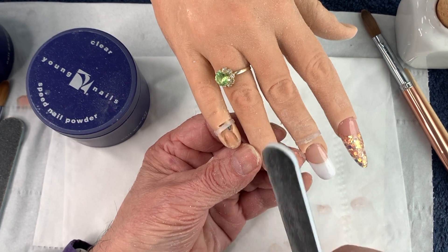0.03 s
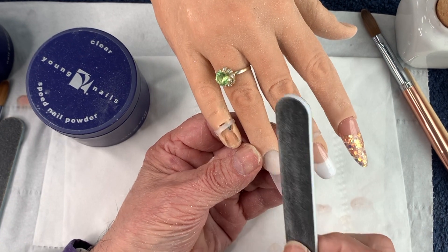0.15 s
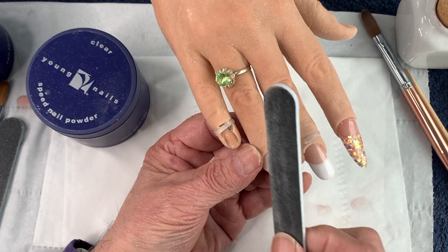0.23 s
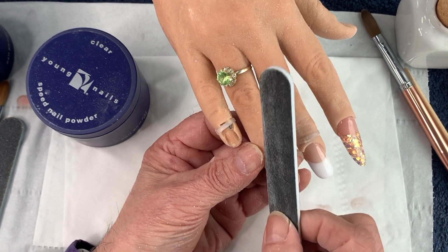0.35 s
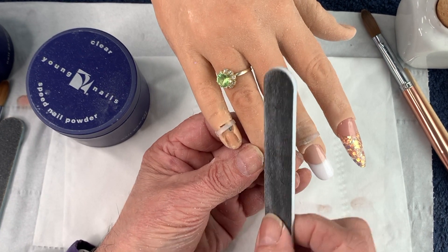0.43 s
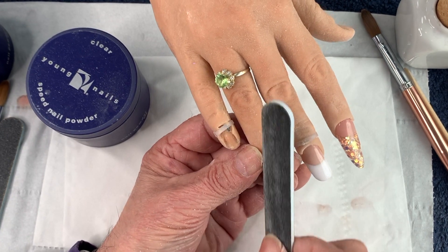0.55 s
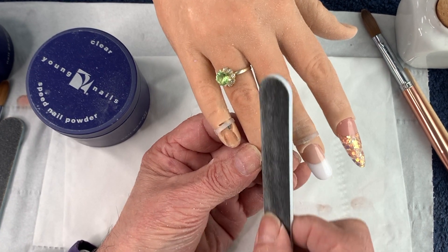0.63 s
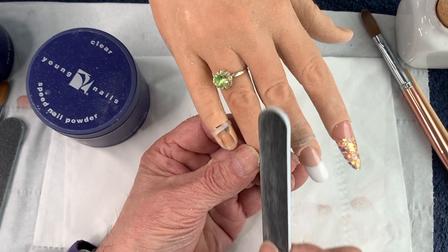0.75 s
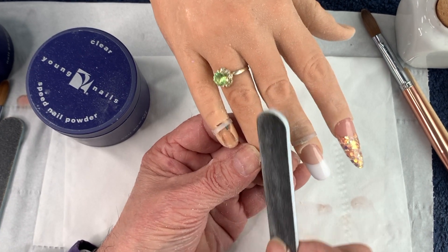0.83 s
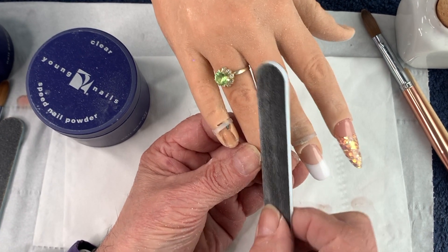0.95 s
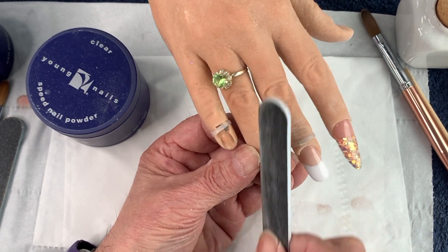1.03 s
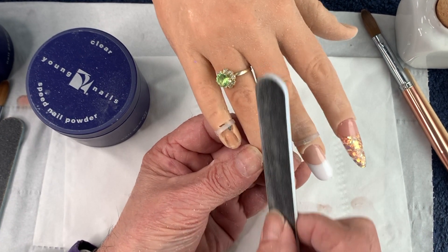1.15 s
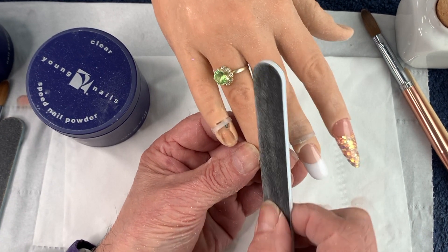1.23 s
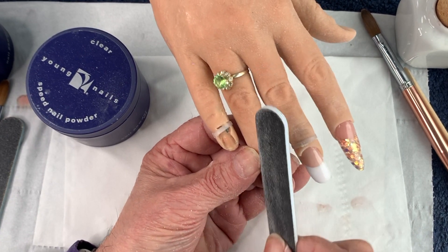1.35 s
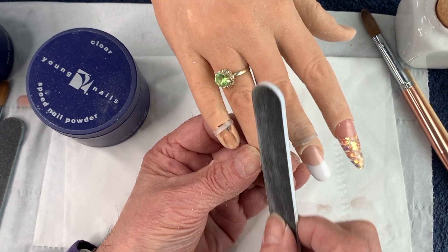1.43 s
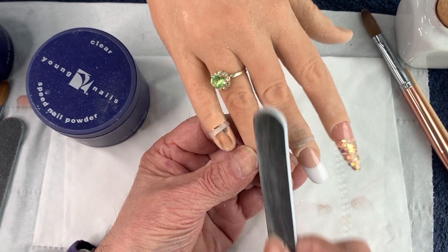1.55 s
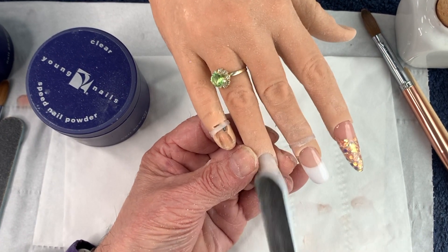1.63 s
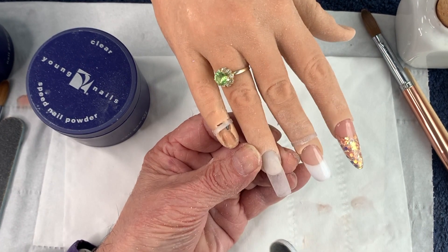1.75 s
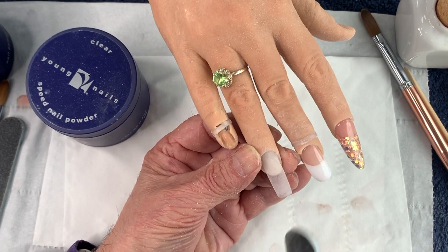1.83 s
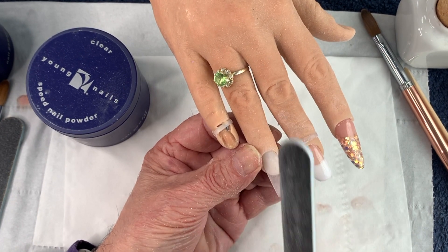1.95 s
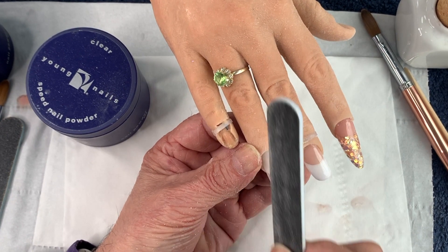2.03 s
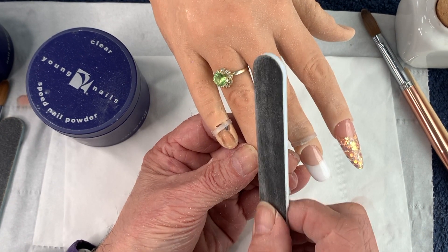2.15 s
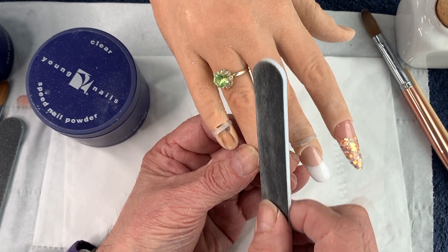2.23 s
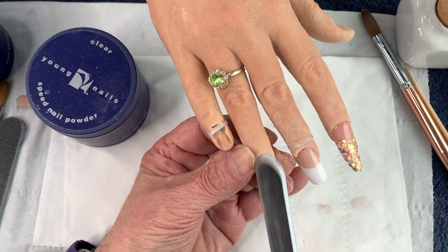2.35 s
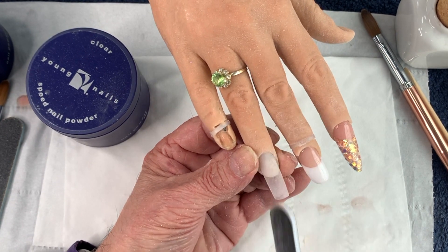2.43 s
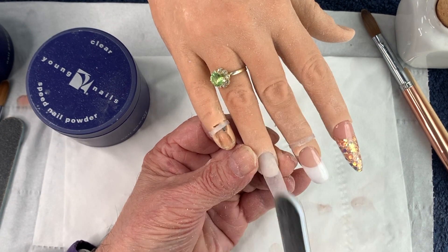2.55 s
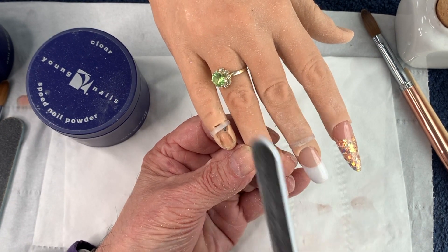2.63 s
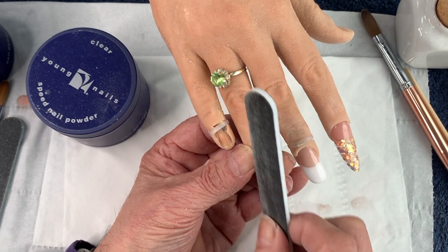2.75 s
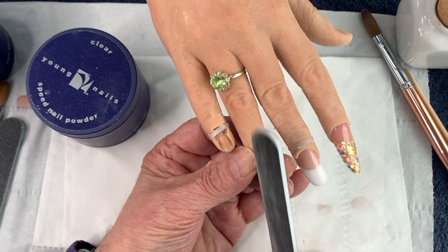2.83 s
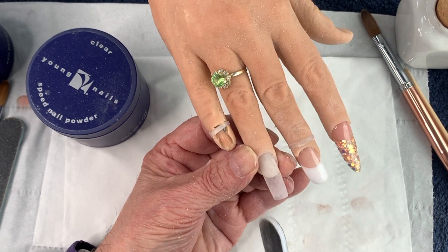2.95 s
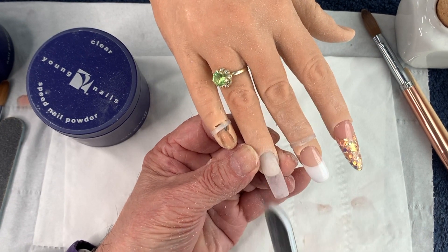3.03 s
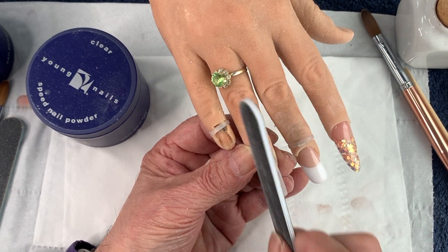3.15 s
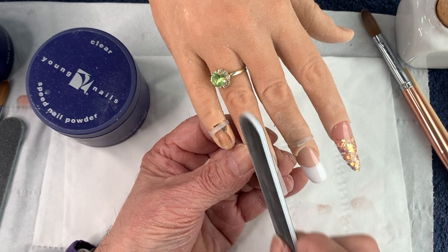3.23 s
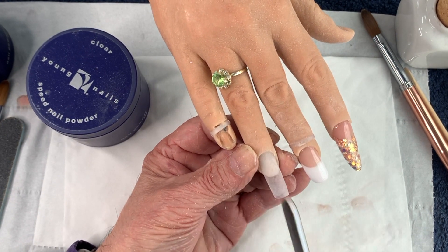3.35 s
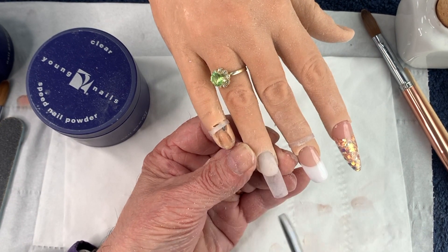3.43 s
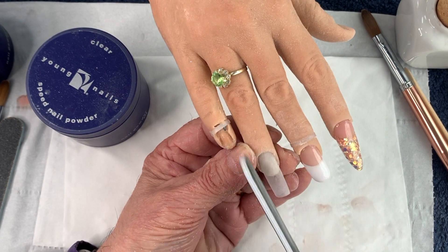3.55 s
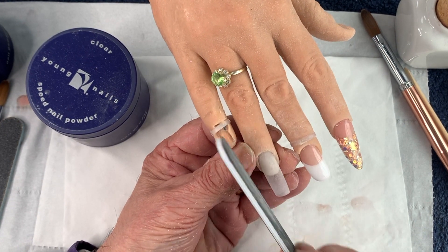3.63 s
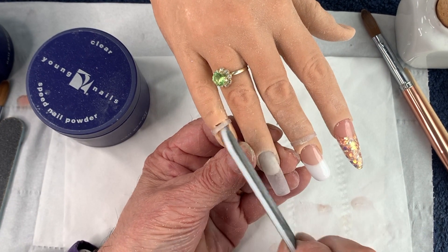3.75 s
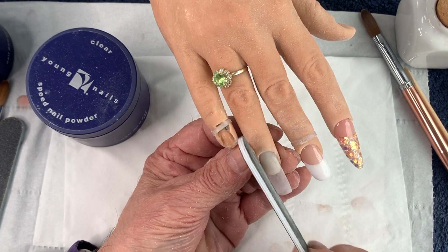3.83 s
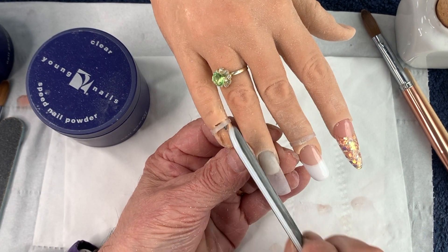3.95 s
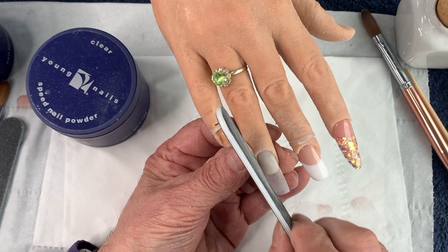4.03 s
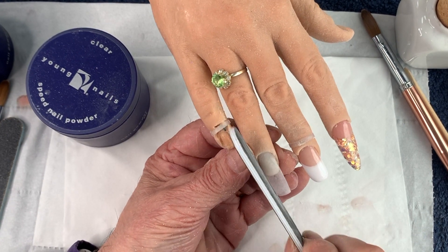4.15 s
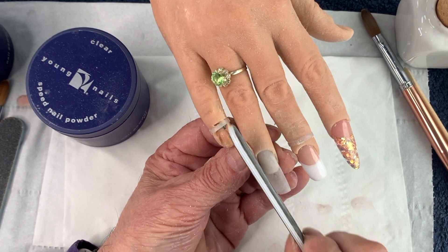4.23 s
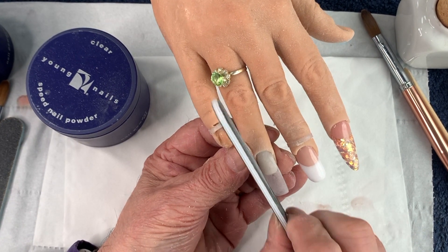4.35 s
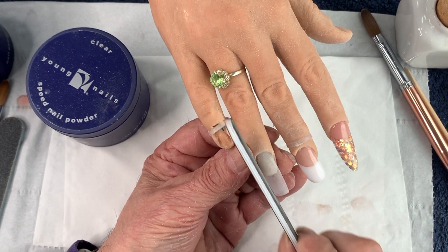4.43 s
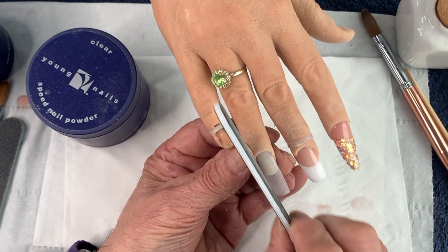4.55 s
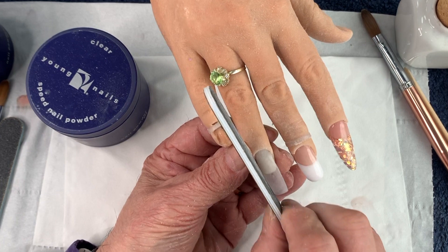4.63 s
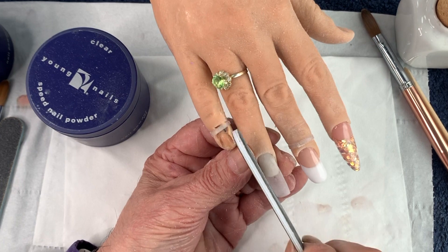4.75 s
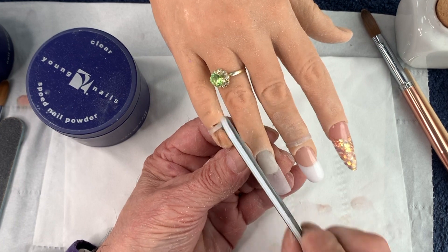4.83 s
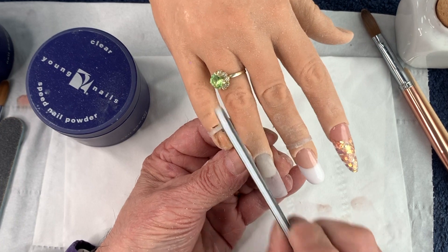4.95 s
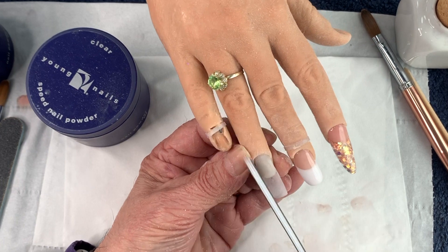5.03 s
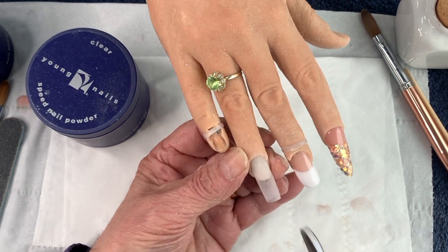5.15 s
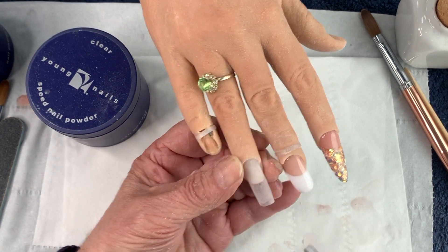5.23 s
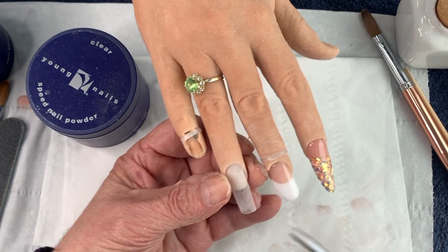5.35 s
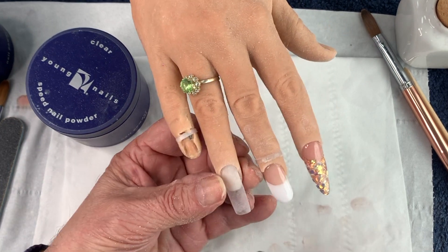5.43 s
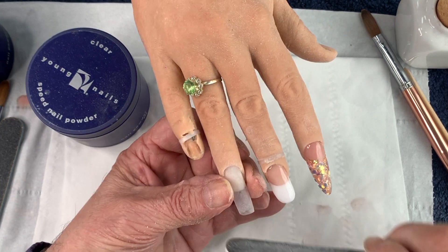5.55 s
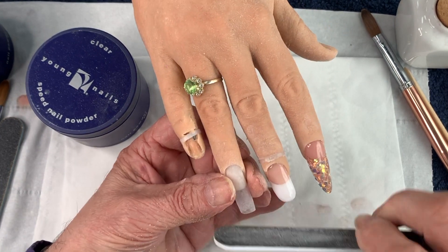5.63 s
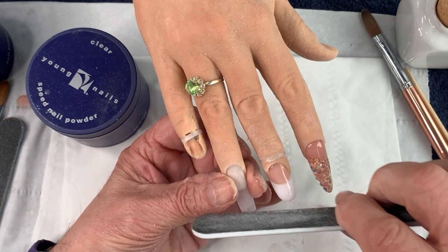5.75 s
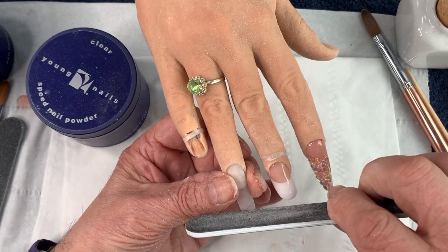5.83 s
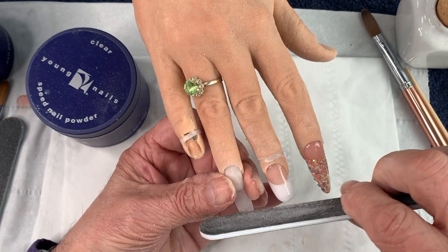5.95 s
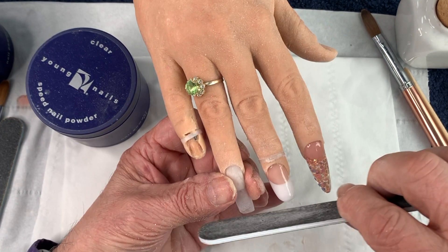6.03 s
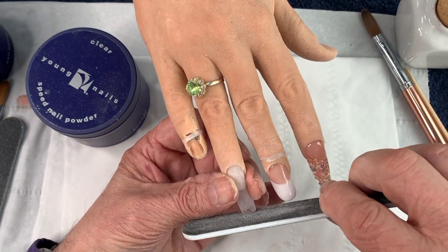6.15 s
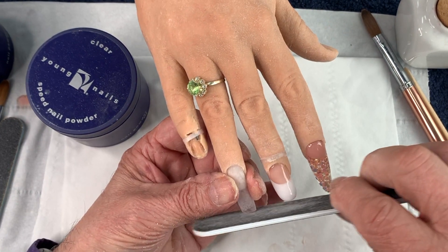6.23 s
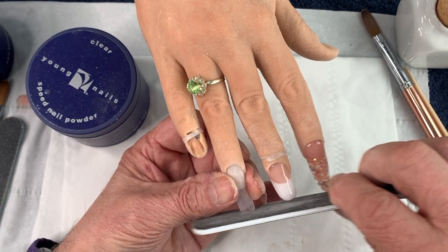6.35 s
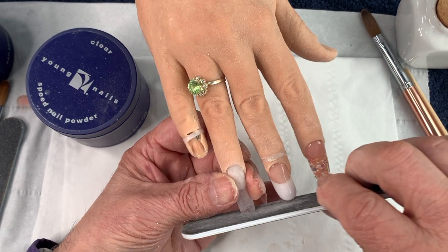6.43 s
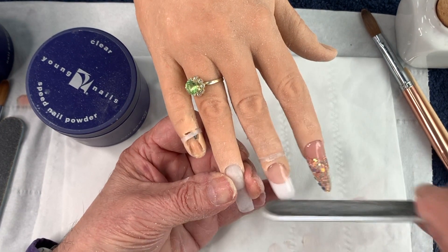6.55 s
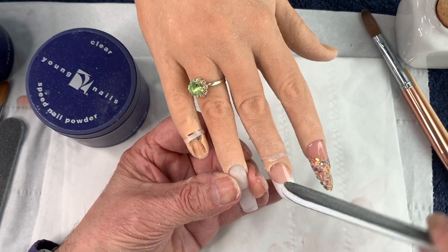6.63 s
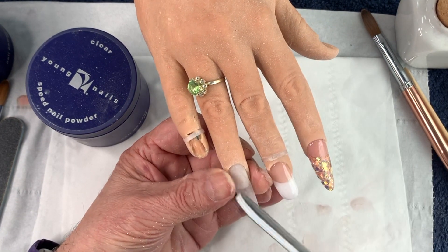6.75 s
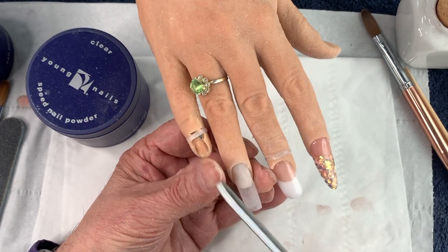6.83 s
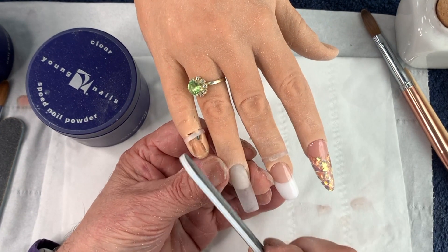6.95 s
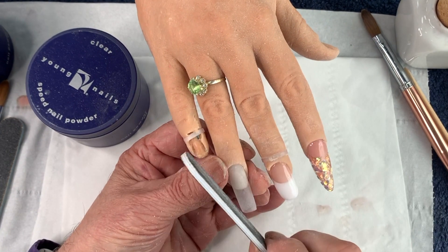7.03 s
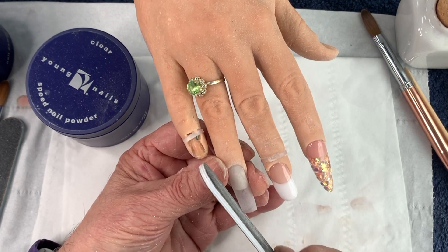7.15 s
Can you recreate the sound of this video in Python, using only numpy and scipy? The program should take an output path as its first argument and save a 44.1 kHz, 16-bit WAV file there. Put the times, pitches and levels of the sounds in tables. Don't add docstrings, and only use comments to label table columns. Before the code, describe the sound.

Close to a stereo microphone in a small, fairly dry room, an emery board files an acrylic nail. A run of quick even rasps ends in a longer pull, then three separated long scrapes follow. Another quick run comes along the side of the nail, then faint thumb rubbing and softer, crackly strokes at the tip. Small dull knocks of the supported hand accompany the filing; distant traffic barely hums.

```python
import sys
import numpy as np
from scipy import signal
from scipy.fft import rfft, irfft, next_fast_len
from scipy.io import wavfile
from scipy.ndimage import uniform_filter1d, map_coordinates

SR = 44100
rng = np.random.default_rng(int(sys.argv[2]) if len(sys.argv) > 2 else 0)


def boost_factor(decibels):
    exponent = np.asarray(decibels, float) / 20
    return 10 ** exponent


def generate_wav(signal):
    frames = np.transpose(np.atleast_2d(signal))
    scaled = np.clip(frames, -1, 1) * 32767
    pcm = np.round(scaled).astype(np.int16)
    wavfile.write(sys.argv[1], SR, pcm)


N = 317564

# time in seconds, level in dB.
BACKGROUND_DB = [(0, -64), (.7, -61), (1.501, -58.5), (2.1, -68.5), (2.599, -64.5), (3.4, -65.5), (4, -65.5),
                 (4.8, -62.5), (5.4, -63.5), (6.102, -71), (6.5, -62), (6.999, -72.5), (7.2, -64.5)]
USUAL_BACKGROUND_DB = -65
# frequency in Hz, density in dB per Hz.
RUMBLE_DB = [(24, -47.5), (40, -10.5), (76, -3.5), (102, -24), (119, -6), (140, -3), (279, -3), (322, -14),
             (357, -6), (386, -18.5), (434, -11.5), (900, -49.5), (1170, -68), (1980, -120)]
HISS_DB = [(410, -14), (700, -5), (873, -9), (1260, -12.5), (1830, -12), (2540, -17.5), (3120, -15),
           (4210, -22.5), (5390, -26.5), (15600, -38)]
# frequency in Hz, left-right likeness 0-1.
STREET_LIKENESS = [(60, .99), (150, .97), (300, .78), (600, .35), (1500, .3), (8000, .1)]
# frequency in Hz, left minus right in dB.
STREET_BALANCE_DB = [(30, -.4), (60, -1), (150, -2.3), (400, -3), (2000, -1)]
# time in seconds, firing rate in Hz, level in dB,
# lean from the second order to the first in dB.
ENGINE_PASSES = [
    [(0, 89.2, -73.5, -9.5), (.5, 94.43, -64, -6), (.9, 94.4, -71, -8.5), (1.25, 95.75, -74.5, -27),
     (1.45, 85.55, -71, 12.5), (1.9, 74.7, -73.5, -8), (2.2, 71.5, -89, -6)],
    [(2.8, 72.2, -89.5, 9.5), (3.4, 75, -74.5, -2.5), (4.3, 79.4, -85.5, 24.5), (5.2, 72.66, -80.5, 15.5),
     (5.7, 70.4, -73, -15.5), (6.3, 68.1, -84, -22.5), (7.2, 67.7, -83.5, -10.5)],
]
# frequency in Hz, width in Hz, level in dB.
WALL_TONES = [(223, 41, -71), (354, 3.3, -80.5)]

# frequency in Hz, width in Hz, level in dB.
NAIL_MODES = [(1150, 500, -16), (1650, 400, -8), (2100, 320, -2), (2650, 500, 0), (3080, 450, -5)]
BOARD_MODES = [(3450, 550, -2), (3900, 450, -1), (4350, 500, 0)]
GRIT_MODES = [(8510, 3900, -3), (10000, 700, -3.5), (11465, 2900, 4.5), (13600, 4000, -10.5),
              (13570, 750, 4), (15200, 2100, -5)]
EDGE_MODES = [(5250, 600, -5), (5900, 700, 0), (6700, 800, -1)]
# start in seconds, length in seconds, pressure in dB,
# place of the fastest moment 0-1, brightness in dB.
OVER_TOP = [(.205, 0.13, -71, 0.92, -19), (.372, 0.11, -48.5, 0.52, -4), (.513, 0.1, -48.5, 0.39, -1),
            (.657, 0.091, -47.5, 0.21, 1), (.778, 0.11, -45, 0.3, 1), (.922, 0.099, -48, 0.5, 1.5),
            (1.05, 0.11, -47.5, 0.4, 2.5), (1.198, 0.092, -48.5, .4, 0), (1.326, 0.097, -49.5, 0.4, 2.5),
            (2.176, 0.031, -72, .6, 0), (2.682, .045, -64, 0.77, 0), (3.108, 0.042, -57, 0.51, -5.5)]
ALONG_SIDE = [(3.735, 0.096, -61, 0.42, -8.5), (3.855, 0.17, -52, 0.495, -1), (4.045, 0.1, -52.5, 0.48, -1),
              (4.175, 0.12, -50, 0.36, 4.5), (4.325, 0.099, -48.5, 0.37, -3),
              (4.455, 0.12, -46.5, 0.44, 2.5), (4.59, 0.13, -46.5, .45, -1), (4.745, 0.13, -50, 0.33, 7.5),
              (7.045, .095, -57, 0.56, -15), (7.168, .025, -70, .3, -14), (7.192, 0.024, -57, 0.15, -12)]
ACROSS_TIP = [
    (5.7, .025, -91, .3, 3),
    (6.51, .07, -73, .3, 3),
    (6.167, 0.075, -59.5, 0.82, 0.89),
    (6.275, .11, -59, .45, 0.099),
    (6.395, .13, -52, 0.5, 0.19),
]
THUMB_WIPE = [
    (5.13, 0.16, -82.5, 0.27, -10.5),
    (5.224, 0.021, -75, .2, 2.5),
    (5.244, 0.069, -74.5, .15, 3),
    (5.325, .1, -80, 0.308, 0),
]
# start in seconds, length in seconds, final pressure in dB,
# swell in dB, brightness in dB.
DRAW_OFF = [
    (1.467, 0.16, -40, 4, 2),
    (2.189, 0.19, -44.5, 4, 1.5),
    (2.711, 0.17, -44, 4, 1),
    (3.15, 0.16, -39.5, 6.5, -4.5),
    (4.89, 0.16, -41.5, 5, -2),
]
# fine grit in dB, nail body in dB, board edge in dB,
# speed already reached at first touch 0-1, gain of the nail along the stroke in dB.
TOP_GRIP = (0, -5.5, -6.5, -0.28, -0.5)
SIDE_GRIP = (-4.5, -11.5, -9, 0.01, 3)
TIP_GRIP = (6.5, 3.7, 1.4, 0.014, .1)
WIPE_GRIP = (18.7, 1.7, 2, 0.19, 4.7)
DRAW_GRIP = (0.5, -6.5, -8, -1, 3.5)
BRUSH_GRIP = (0, -6, -6, .3, 0)
SPEED_POWER = 1.536
LAND_S, BITE_DB, BITE_T60_S = 0.0016, -17.5, 0.02
CATCH_S, LIFT_S = 0.015, 0.0085
# time in seconds, half length in seconds, extra pressure in dB.
SURGES = [(.378, 0.0057, 8), (0.427, 0.016, 2), (0.831, 0.012, 3), (1.543, .01, 2), (1.607, 0.0086, 3),
          (2.28, .015, 2), (2.32, .006, 3), (2.346, 0.0053, 5), (2.364, 0.0055, 3), (2.833, 0.0096, 6),
          (2.852, .006, -2.5), (3.207, 0.0052, 3), (3.263, .015, 4), (3.29, 0.0063, -2.5),
          (3.91, 0.013, 2.5), (3.93, .008, -3), (4.64, .012, 3), (4.995, .005, 5), (5.005, .004, -3),
          (5.012, .007, 4.5), (5.03, .01, -4), (5.256, .008, 9), (5.235, .008, 3), (5.355, .01, 4),
          (4.6, .004, 8), (5.048, .006, 3), (1.615, .003, 4), (6.423, .006, 3.5), (6.465, 0.018, 2)]
# time in seconds, spread in dB.
GRAIN_SPREAD_DB = [
    (0, 1.1),
    (5.1, 1.1),
    (5.15, 2.2),
    (7.2, 2.4),
]

# time in seconds, frequency in Hz, width in Hz, level in dB.
TICKS = [(0.209, 4600, 603, -64.5), (2.12, 12000, 2470, -80), (2.12, 2300, 500, -77.5),
         (2.645, 11200, 800, -62), (2.683, 11100, 900, -59), (2.12, 6900, 600, -82),
         (5.697, 3900, 400, -78), (2.82, 2900, 1280, -40), (3.525, 2430, 600, -70.5),
         (3.54, 10970, 1200, -65.5), (5.135, 7940, 700, -63.5), (5.496, 7000, 3030, -82),
         (5.934, 2380, 2490, -76), (5.935, 7650, 1500, -80.5), (5.937, 12900, 1200, -75),
         (6.591, 11500, 1200, -75)]
# time in seconds, length in seconds, frequency in Hz, width in Hz, level in dB.
RUBS = [(2.19, .09, 2100, 350, -54), (.375, .07, 2100, 350, -60), (2.72, .14, 2200, 450, -52),
        (1.47, .06, 2050, 350, -54), (7.055, .08, 3550, 500, -58), (5.695, .055, 2250, 300, -74),
        (3.3, .16, 4100, 600, -64), (2.875, .09, 3900, 600, -64), (.53, .05, 2050, 350, -60),
        (4.92, .1, 2100, 400, -55), (5.14, 0.1, 11100, 700, -74.5), (5.264, 0.13, 1780, 400, -66.5),
        (5.232, .03, 250, 150, -57), (5.281, 0.18, 636, 450, -69), (5.683, 0.087, 6840, 900, -79),
        (5.687, 0.061, 2830, 2000, -73.5), (6.174, 0.08, 660, 149, -64), (6.415, .1, 2700, 700, -46),
        (6.418, .096, 620, 298, -62), (6.45, 0.074, 1470, 500, -49.5), (7.068, 0.076, 2400, 700, -55.5),
        (6.197, 0.035, 2560, 703, -50.5)]
# time in seconds, peak in dB,
# brightness in dB.
SNAGS = [(1.6045, -28.5, 9.5), (1.6088, -29.5, 1), (1.6157, -22, 12), (2.3455, -27.5, -5),
         (2.8406, -22.5, -8.5), (3.153, -30, -12), (3.1867, -28, -6), (3.258, -32, -17.5), (3.2992, -24, 0),
         (3.3009, -25, 0), (4.9923, -34.5, -18), (5.0112, -23, -14), (5.2281, -60, 13), (5.2544, -47, 8),
         (5.2585, -58, 14),
         (6.1709, -50, 0), (6.1814, -50, -2), (6.1948, -39, 0), (6.2074, -37, 0), (6.2113, -37, 0),
             (6.2153, -35, 0.5), (6.2214, -34, -0.5), (6.2284, -35.5, 2), (6.2821, -45.5, 0),
             (6.2954, -41.5, 0), (6.3081, -37, 0.5), (6.3274, -38, 0), (6.3984, -38, -0.5),
             (6.4093, -40, 0), (6.4224, -34, -0.5), (6.4324, -32, 0), (6.4454, -30, -3), (6.4534, -30, 0.5),
             (6.4674, -31, -0.5), (6.4884, -34, 0), (6.5074, -36, 0),
         (0.376, -43, -12), (2.8344, -24, -12), (3.2334, -28, -12), (3.272, -25, -12),
                (4.5979, -41, -12), (4.634, -33, -12), (4.9614, -28.5, -12.5), (5.0174, -26, -12),
                (7.0584, -55, -12), (7.0728, -51, -12), (7.0813, -46, -11.5), (7.0874, -47, -12),
                (7.0984, -43, -14), (7.1038, -41, -12), (7.1174, -42, -15), (7.1944, -43, -17)]
# time in seconds, peak in dB,
# weight of the first mode in dB, weight of the second mode in dB.
KNOCKS = [(0.527, -51, -6, -17), (0.783, -40, -12, -11), (0.882, -45.5, -6, -18), (0.989, -51.5, -7.5, -23),
          (1.061, -39, -17, -14), (1.15, -43.5, -10.5, -10), (1.19, -40, -10, -4.5),
          (1.251, -43.5, -12, -12), (1.336, -45, -33, -12), (1.415, -47.5, -5, -12),
          (1.458, -36.5, -16, -8), (3.707, -44, -12.5, -9.5), (4.176, -48.5, -5.5, -13),
          (4.459, -47.5, -9, -20), (4.652, -57, -8, -25), (4.751, -47, -4.5, -13), (4.894, -44.5, -3.5, -4)]
# frequency in Hz, level in dB, t60 in seconds.
STAND_MODES = [(404, 17, .06), (609, 11.5, .07), (753, 4.5, .07), (1278, 0.5, 0.04), (1980, -2.5, 0.027)]

# frequency in Hz, level in dB.
TABLE_DB = [(600, -2), (1400, -18.5), (1900, -5.5), (2500, -3.5), (3050, -5.5), (3700, -5.5), (4600, -3),
            (5050, 6.5), (5700, 4), (7000, -1.5), (7600, -0.5), (8300, -1), (13000, -2), (15500, -9)]
# frequency in Hz, t60 in seconds.
ROOM_T60_S = [(300, 0.099), (2000, 0.17), (4000, 0.31), (5500, 0.24), (10000, 0.14), (15000, 0.15)]
# frequency in Hz, lead of the left port in radians.
PORT_LEAD_RAD = [(0, 0), (600, 0.9), (1030, .2), (2330, 0.7), (2580, 2.0), (3010, 1.1), (4310, 1.1),
                 (4850, 1.9), (5350, 3.1), (6000, 4.2), (7200, 5.3), (7900, 6.1), (8870, 6.4),
                 (11750, 9.25), (13050, 9.58), (15000, 11.8), (15300, 12.5)]
# frequency in Hz, left minus right in dB.
PORT_BALANCE_DB = [(60, -1.0), (180, -2.5), (550, -3.0), (1650, -2.5), (4970, -1.0), (15000, 0.0)]
# time in seconds, share 0-1.
HAND_SPILL = [(0, .4), (.9, .25), (3.5, .25), (3.7, .9), (5.1, .9), (5.2, .05), (5.5, .05), (6, .7),
              (7.2, .7)]
# frequency in Hz, distance under the other in dB.
DROP_UNDER_DB = [(3000, 17), (5400, 16), (8300, 19), (12400, 22), (15500, 23)]
BAND_BINS = np.r_[0, 132, 144, 160, 176, 196, 216, 240, 264, 292, 320:769:32]


def evened(x):
    return x / np.sqrt(np.mean(x ** 2) + 1e-20)


def read(points, hz):
    f, value = np.transpose(points)
    return np.interp(np.log(hz + 1), np.log(f + 1), value)


def over_time(points):
    return np.interp(np.arange(N) / SR, *np.transpose(points))


def add(mix, s, sound):
    part = mix[round(s * SR):][:len(sound)]
    part += sound[:len(part)]


def drift(seconds):
    size = max(int(seconds * SR), 2)
    return evened(uniform_filter1d(uniform_filter1d(rng.standard_normal(N), size), size))


def resonate(x, hz, width_hz):
    turn = np.exp(2j * np.pi * np.cumsum(hz * np.ones(len(x))) / SR)
    r = np.exp(-np.pi * width_hz / SR)
    smooth = signal.lfilter([(1 - r) ** 2], [1, -2 * r, r * r], x / turn + 1e-18)
    return 2 * (turn * smooth).real


def background(spectrum, follow, gain_db, patchy_db):
    frames, hz = N // 512 + 5, np.fft.rfftfreq(2048, 1 / SR)
    a, b, c, d, patches = rng.standard_normal((frames, 1025, 5)).T
    patches = uniform_filter1d(patches, size=4, axis=0)
    patches = evened(uniform_filter1d(patches, size=10, axis=1))
    same = np.clip(read(STREET_LIKENESS, hz), -1, 1)[:, None]
    left = a + 1j * b
    right = same * left + np.sqrt(1 - same ** 2) * (c + 1j * d)
    right = right / boost_factor(read(STREET_BALANCE_DB, hz))[:, None]
    z = np.array([left, right]) * boost_factor(read(spectrum, hz)[:, None] + patchy_db * patches)
    noise = evened(signal.istft(z, nperseg=2048, noverlap=1536)[1][:, :N])
    return boost_factor(gain_db + follow * (over_time(BACKGROUND_DB) - USUAL_BACKGROUND_DB)) * noise


def engine():
    out = np.zeros(N)
    for rows in ENGINE_PASSES:
        s, hz, level_db, lean_db = np.transpose(rows)
        orders_db = [level_db + lean_db / 2, level_db - lean_db / 2, level_db - 1.5]
        t = np.arange(s[0], s[-1], 1 / SR)
        turns = np.cumsum(np.interp(t, s, hz) * (1 + .006 * drift(0.035)[:len(t)])) / SR
        for order, db in enumerate(orders_db, 1):
            waver = boost_factor(np.interp(t, s, db) + 0.28 * drift(0.013)[:len(t)])
            add(out, s[0], np.sqrt(2) * waver * np.sin(2 * np.pi * (order * turns + rng.random())))
    return out


def walls():
    out = np.zeros(N)
    for hz, width_hz, db in WALL_TONES:
        out += boost_factor(db + 0.7 * drift(.15)) * evened(resonate(rng.standard_normal(N), hz, width_hz))
    return out


def quick(t, length, peak, touch):
    turn = np.interp(t / length, [0, np.clip(peak, .05, .95), 1], [np.clip(touch, 0, .4), 1 / 2, 1])
    return abs(np.sin(np.pi * turn)) ** SPEED_POWER


def drawn(t, length, swell_db, touch):
    hold = 1 - (1 - np.clip(touch, 0, 1)) * np.exp(-t / CATCH_S)
    hold = hold * np.clip((length - t) / LIFT_S, 0, 1)
    return hold ** SPEED_POWER * boost_factor(swell_db * (t / length - 1))


def all_strokes():
    brushes = [(s + length - LIFT_S, .065, db - 22, .3, 2.5) for s, length, db, *rest in DRAW_OFF]
    runs = [(OVER_TOP, quick, TOP_GRIP), (ALONG_SIDE, quick, SIDE_GRIP), (ACROSS_TIP, quick, TIP_GRIP),
            (THUMB_WIPE, quick, WIPE_GRIP), (DRAW_OFF, drawn, DRAW_GRIP), (brushes, quick, BRUSH_GRIP)]
    strokes = [(row, shape, grip) for rows, shape, grip in runs for row in rows]
    return sorted(strokes, key=lambda stroke: stroke[0][0])


def surges():
    out = np.zeros(N)
    for s, half_s, db in SURGES:
        t = np.arange(-2 * half_s, 2 * half_s, 1 / SR)
        add(out, s - 2 * half_s, db * np.exp(-2 * (t / half_s) ** 2))
    return boost_factor(out)


def grain_catches():
    spread_db = over_time(GRAIN_SPREAD_DB)
    sizes = boost_factor(spread_db * np.minimum(rng.exponential(1, N), 7))
    sizes = sizes * np.sqrt(1 - spread_db * np.log(10) / 10)
    grains = sizes * (rng.random(N) < 11000 / SR)
    return evened(grains * boost_factor(1.1 * drift(.003)))


def ring(drive, modes, wander, patchy_db):
    out = np.zeros(N)
    for hz, width_hz, db in modes:
        struck = drive * rng.choice([-1, 1], N) * boost_factor(db + patchy_db * drift(0.022))
        out += resonate(struck, hz * (1 + wander * drift(0.025)), width_hz)
    return evened(out)


def file_strokes():
    grains = grain_catches()
    force = np.zeros((4, N))
    for (s, length, db, form, bright_db), shape, grip in all_strokes():
        grit_db, nail_db, edge_db, touch, nail_along_db = grip
        t = np.arange(0, length, 1 / SR)
        bite = boost_factor(BITE_DB - 60 * t / BITE_T60_S)
        press = boost_factor(db) * (shape(t, length, form, touch) + bite) * np.clip(t / LAND_S, 0, 1)
        shares_db = [0, grit_db + bright_db, nail_db, edge_db + 0.43 * bright_db]
        alongs_db = [0, 3.5, nail_along_db, 1.5]
        for row, share_db, along_db in zip(force, shares_db, alongs_db):
            add(row, s, press * boost_factor(share_db + along_db * (t / length - 1 / 2)))
    board, grit, nail, edge = force * surges()
    out = boost_factor(1.5) * board * ring(grains, BOARD_MODES, wander=.02, patchy_db=1.5)
    out += boost_factor(5.0) * grit * ring(grains, GRIT_MODES, wander=0.004, patchy_db=-0.5)
    out += boost_factor(6.5) * nail * ring(grains, NAIL_MODES, wander=0.063, patchy_db=3.0)
    out += boost_factor(1.5) * edge * ring(grains, EDGE_MODES, wander=0.0032, patchy_db=-1.5)
    return out


def scuffs():
    out = np.zeros(N)
    ticks = [(s, 0.031, *row, .2) for s, *row in TICKS]
    rubs = [(*row, 0.34) for row in RUBS]
    for s, length, hz, width_hz, db, peak in ticks + rubs:
        grit = rng.standard_normal(SR // 2) * boost_factor(3.5 * rng.exponential(1, SR // 2))
        noise = evened(resonate(grit, hz, width_hz))[SR // 4:][:int(length * SR)]
        swell = np.interp(np.linspace(0, 1, len(noise)), [0, np.clip(peak, .02, .9), 1], [0, 1, 0])
        add(out, s, boost_factor(db) * noise * swell)
    return out


def snags():
    dull, bright = np.zeros((2, N))
    rows = SNAGS
    cracks = rng.standard_normal((len(rows), 80)) * np.exp(-np.arange(80) / 14)
    cracks = cracks / abs(cracks).max(1, keepdims=True)
    for (s, db, bright_db), crack in zip(rows, cracks):
        add(dull, s, boost_factor(db) * crack)
        add(bright, s, boost_factor(db + bright_db) * crack)
    dull = resonate(resonate(dull, 3800, 3600), 3800, 3600)
    return boost_factor(6.5) * dull + boost_factor(7.5) * resonate(bright, 10500, 4300)


def knocks():
    out, t = np.zeros(N), np.arange(5000) / SR
    chance = rng.standard_normal((len(KNOCKS), len(STAND_MODES), 2))
    rattle = rng.standard_normal((len(KNOCKS), len(t)))
    for (s, db, *low_db), rows, noise in zip(KNOCKS, chance, rattle):
        add(out, s, boost_factor(db - 16.0 - 60 * t / 0.038) * evened(resonate(noise, 900, 890)))
        weights_db = low_db + [0, 0, 0]
        for (hz, mode_db, t60_s), weight_db, (a, b) in zip(STAND_MODES, weights_db, rows):
            decay = boost_factor(db - 9.5 + mode_db + weight_db + 0.66 * a - 60 * t / t60_s)
            onset = 1 - np.exp(-t * hz / 2.7)
            add(out, s, onset * decay * np.sin(2 * np.pi * hz * (1 + 0.023 * b) * t))
    return out


def place():
    ends = [(row[0], row[0] + row[1]) for row, shape, grip in all_strokes()]
    sides = [((-1) ** k, -(-1) ** k) for k in range(len(ends))]
    return np.interp(np.arange(N) / SR, np.maximum.accumulate(np.ravel(ends)), np.ravel(sides))


def table(x):
    echo_s, slide, share = .00039, .05, .3
    late = echo_s * SR * (1 + slide * (place() + drift(0.17)))
    x = x - share * map_coordinates(x, [np.arange(N) - late], order=3)
    size = next_fast_len(N)
    colour = boost_factor(read(TABLE_DB, np.fft.rfftfreq(size, 1 / SR)))
    return irfft(rfft(x, size) * colour, size)[:N]


def room(x):
    taps = np.zeros((2, SR // 2))
    at = np.arange(200, SR // 2 - 20, 20) + rng.integers(0, 20, (2, (SR // 2 - 201) // 20))
    np.put_along_axis(taps, at, rng.choice([-1., 1.], at.shape), 1)
    hz, t, z = signal.stft(taps, SR, nperseg=256)
    decay = boost_factor(-60 * t / read(ROOM_T60_S, hz)[:, None])
    tail = signal.istft(z * decay, SR, nperseg=256)[1]
    return signal.fftconvolve(x[None], tail / np.linalg.norm(tail[0]), axes=1)[:, :N]


def ports(x):
    scatter, scatter_hz = .45, 9000
    sway_s, sway_takes_s = 1.1e-6, .06
    opposite = np.array([[1], [-1]])
    size = next_fast_len(N)
    hz, (f, lead) = np.fft.rfftfreq(size, 1 / SR), np.transpose(PORT_LEAD_RAD)
    half = boost_factor(read(PORT_BALANCE_DB, hz) / 2) * np.exp(.5j * np.interp(hz, f, lead))
    pair = rfft(x, size) * np.array([half, 1 / half])
    lower = irfft(pair / (1 + (hz / scatter_hz) ** 4), size)[:, :N]
    thrown = np.array([lower.mean(0) + over_time(HAND_SPILL) * lower[1], lower[0]])
    z = signal.stft(thrown, nperseg=256)[2]
    z = z * np.exp(2j * np.pi * rng.random(z.shape))
    common, apart = signal.istft(z, nperseg=256)[1][:, :N]
    slope = irfft(pair * 2j * np.pi * hz, size)[:, :N]
    sway = slope * sway_s * drift(sway_takes_s) * opposite
    return irfft(pair, size)[:, :N] + sway + scatter * (common + apart * opposite)


def scene():
    near = table(file_strokes() + snags()) + knocks() + scuffs()
    close, far = room(near)
    rumble = background(RUMBLE_DB, follow=1.0, gain_db=-67, patchy_db=2.5)
    hiss = background(HISS_DB, follow=1.5, gain_db=-77, patchy_db=4.0)
    hum = (engine() + walls()) * boost_factor([[-.9], [.9]])
    hands = ports(near + boost_factor(-14.5) * close)
    return hands + boost_factor(-26.0) * far * np.array([[1], [-1]]) + rumble + hiss + hum


def joint_stereo(x):
    budget_db, offset = 3.5, 675
    frame = dict(window="cosine", nperseg=2048, noverlap=1024)
    both_apart = np.pad([x[0] + x[1], x[0] - x[1]], ((0, 0), (offset, 0)))
    z = signal.stft(both_apart, **frame)[2] / 2
    power = np.add.reduceat(abs(z) ** 2, BAND_BINS, axis=1)
    margin = boost_factor(2 * read(DROP_UNDER_DB, BAND_BINS * SR / 2048))[:, None]
    margin = margin * boost_factor(2 * budget_db * rng.standard_normal(z.shape[2]))
    keep = power * margin > power[::-1]
    keep[:, 0] = True
    z = z * np.repeat(keep, np.diff(np.r_[BAND_BINS, 1025]), axis=1)
    both, apart = signal.istft(z, **frame)[1][:, offset:][:, :N]
    return np.array([both + apart, both - apart])


def top_cut(x):
    return signal.sosfilt(signal.butter(12, 15800, fs=SR, output="sos"), x)


def record(dry):
    thin = signal.sosfilt(signal.butter(5, 50, "high", fs=SR, output="sos"), dry)
    treble_cut = signal.firwin(401, 15750, window=("kaiser", 9), fs=SR)
    thin = signal.oaconvolve(thin, treble_cut[None], "same")
    mix = joint_stereo(thin)
    return top_cut(mix)


dry = scene()
out = record(dry)
generate_wav(out)
```